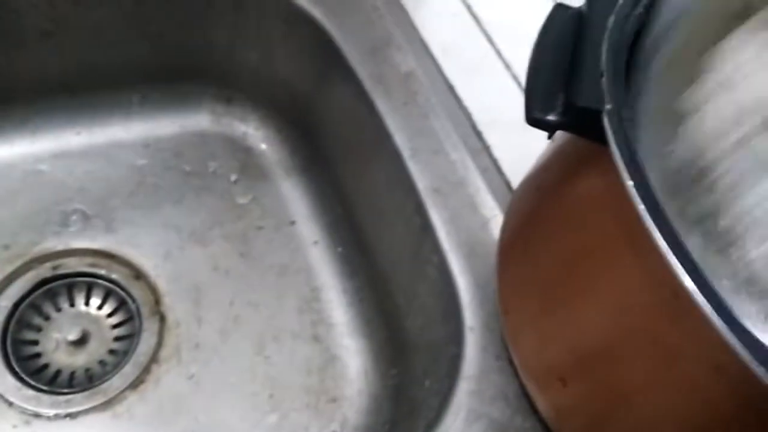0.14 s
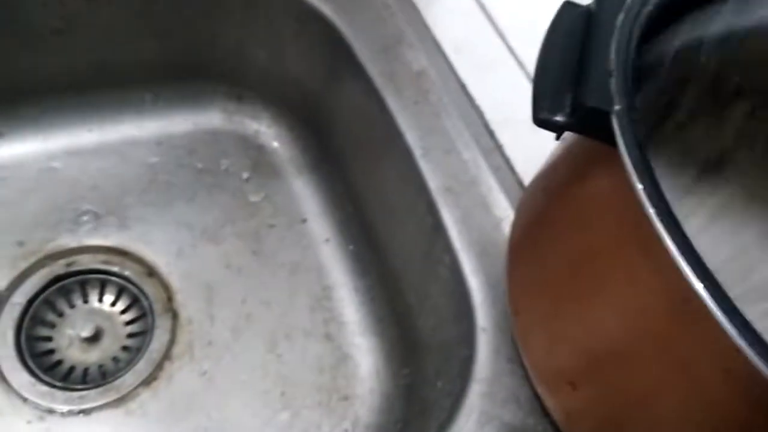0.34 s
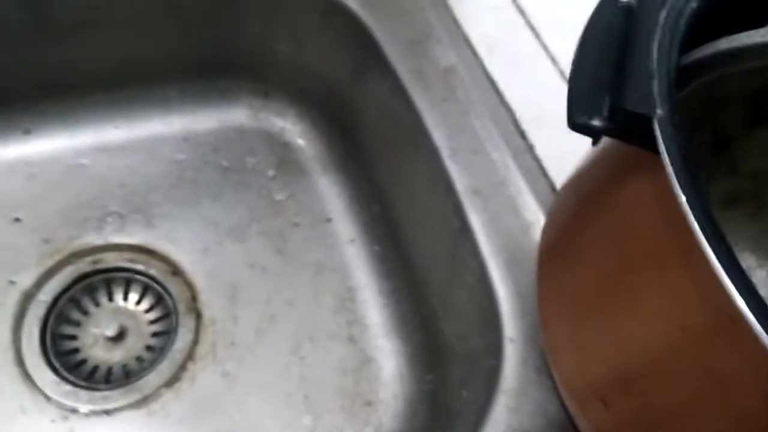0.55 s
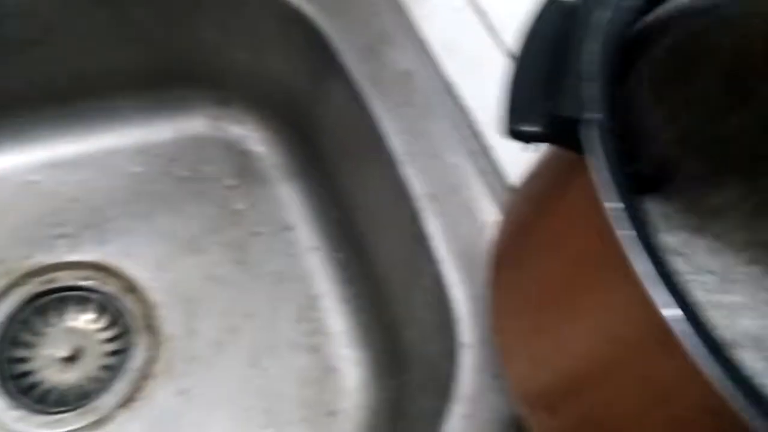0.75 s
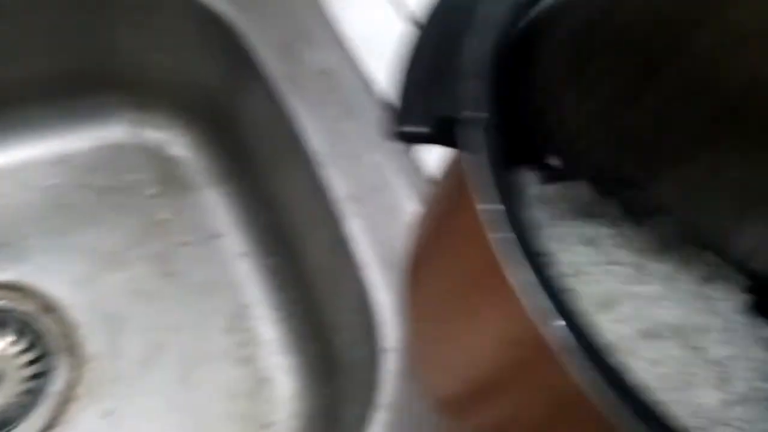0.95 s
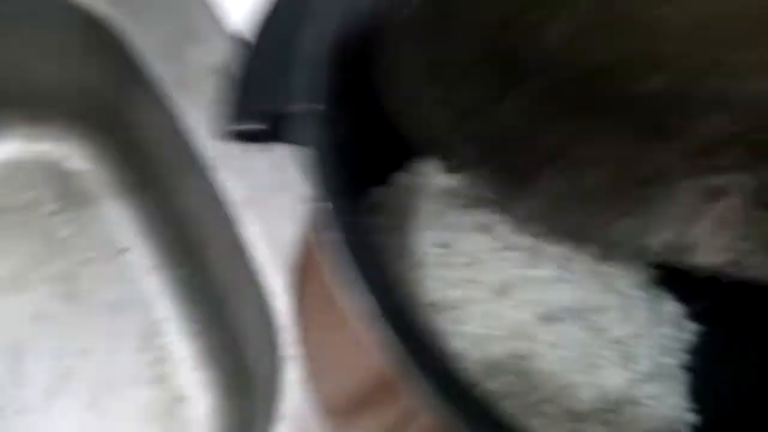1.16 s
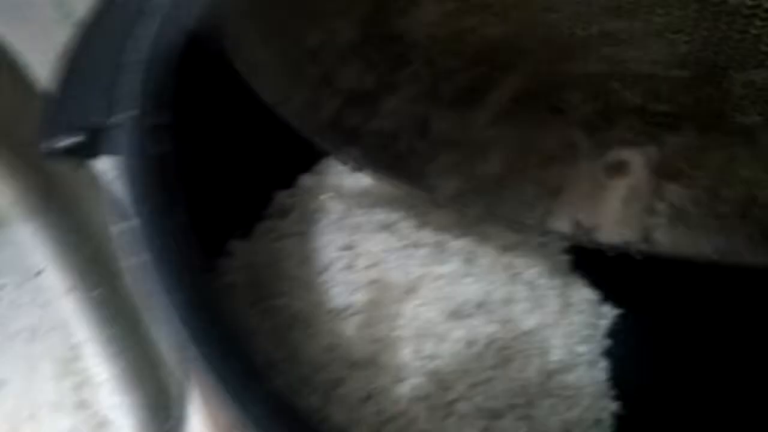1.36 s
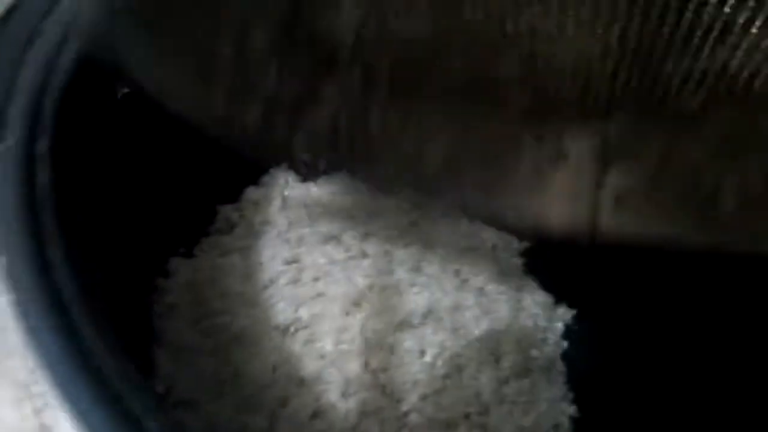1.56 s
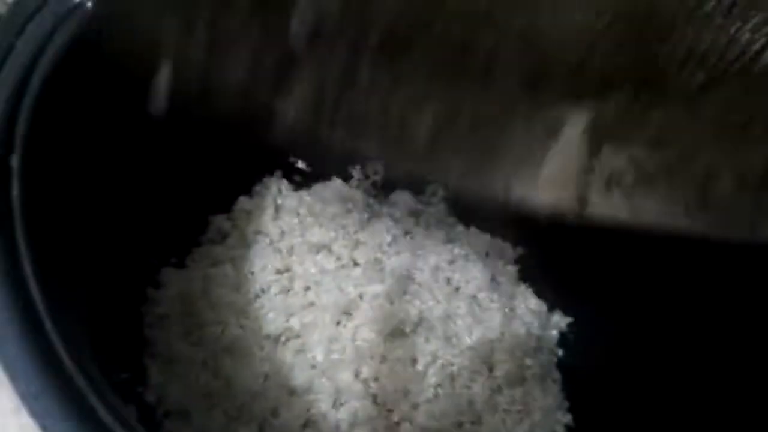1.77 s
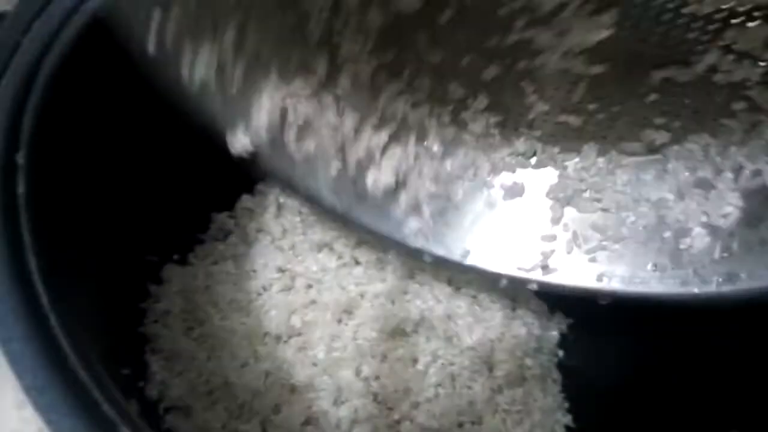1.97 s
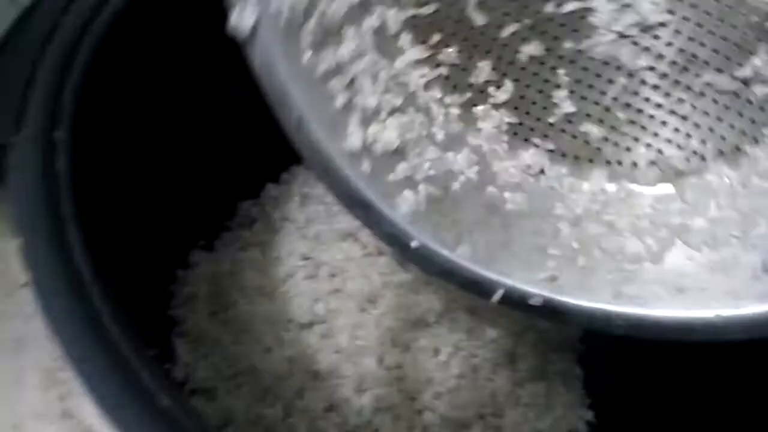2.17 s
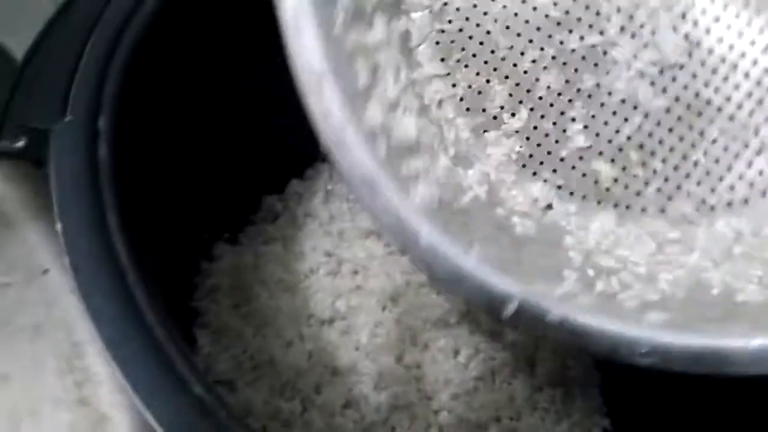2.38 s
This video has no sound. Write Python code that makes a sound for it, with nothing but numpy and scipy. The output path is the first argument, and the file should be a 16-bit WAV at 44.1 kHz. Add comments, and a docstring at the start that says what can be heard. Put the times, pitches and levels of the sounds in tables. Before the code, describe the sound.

Close up in a quiet, hard-walled kitchen, wet rice is tipped into a pot: a hollow knock, a short steel ring and a bright grainy rush, thinning to scattered crisp ticks of falling clumps and a few softer bumps.

```python
"""Wet rice poured into a pot

Wet rice slides out of a metal strainer into a cooking pot, heard close up in a hard-walled kitchen.
The strainer knocks the pot, exciting damped modes in both. The mass lands, and a thinner stream and
single clumps follow: many tiny impacts that add up to bright noise. The room reverberates over
the kitchen's hum and hiss, and a low handling rumble comes and goes."""
import sys
import numpy as np
from scipy import signal
from scipy.fft import rfft, irfft, next_fast_len
from scipy.io import wavfile
from scipy.ndimage import uniform_filter1d, map_coordinates

SR = 44100
rng = np.random.default_rng(int(sys.argv[2]) if len(sys.argv) > 2 else 0)


def persist_wave(psi):
    """Save psi, clipped to +-1, as 16-bit WAV."""
    counts = np.round(np.clip(psi, -1, 1) * 32767).astype(np.int16)
    wavfile.write(sys.argv[1], SR, np.atleast_2d(counts).T)


N = 108045


def amp(db):
    """Decibels to amplitude ratio."""
    return 10 ** (np.asarray(db) / 20)


def unit(x):
    """Normalisation to rms 1."""
    return x / np.sqrt(np.mean(x ** 2) + 1e-20)


def along(points, hz):
    """Interpolation of (frequency, value) points on a logarithmic frequency axis."""
    f, values = np.transpose(points)
    return np.interp(np.log(hz + 1), np.log(f + 1), values)


def curves(rows):
    """Linear interpolation of each column after the time, one value per sample."""
    times, *columns = np.transpose(rows)
    return [np.interp(np.arange(N) / SR, times, column) for column in columns]


def wobble(rate):
    """Smooth random modulation: a spline through `rate` knots a second."""
    return map_coordinates(rng.standard_normal(int(N * rate / SR) + 4), [np.arange(N) * rate / SR])


def filtered(x, response):
    """Linear filtering: the spectrum of x times a frequency response."""
    size = next_fast_len(x.shape[-1] + 8192)
    return irfft(rfft(x, size) * response(np.fft.rfftfreq(size, 1 / SR)), size)[..., :x.shape[-1]]


def coloured(x, spectrum):
    """Spectral shaping by (frequency, level) points, at rms 1."""
    return unit(filtered(x, lambda hz: amp(along(spectrum, hz))))


def resonance(f, hz, width_hz):
    """Band-pass response of a damped oscillator."""
    return 1j * f * width_hz / (hz * hz - f * f + 1j * f * width_hz)


def noise_band(size, hz, width_hz):
    """White noise through two equal resonators in series, at rms 1."""
    return unit(filtered(rng.standard_normal(size), lambda f: resonance(f, hz, width_hz) ** 2))


def add(track, start, x):
    """Superposition of x on the track from `start` seconds."""
    part = track[round(start * SR):][:len(x)]
    part += x[:len(part)]


def ring(modes, t, tilt_db=0, pivot_hz=1000, scatter_db=1.5):
    """Modal synthesis: damped sinusoids of alternating sign, their levels scattered at each blow."""
    out = np.zeros(len(t))
    for k, (hz, db, t60) in enumerate(modes):
        level_db = db + tilt_db * np.log2(hz / pivot_hz) + rng.normal(0, scatter_db)
        out += (-1) ** k * amp(level_db - 60 * t / t60) * np.sin(2 * np.pi * hz * t)
    return out


# Spectrum of the kitchen's hum and hiss: (frequency [Hz], relative density [dB])
AIR_SPECTRUM = [(15, -30), (40, -15), (175, -7), (290, 2), (500, -13.5), (700, -11.5), (1200, -20),
                (3000, -25), (7500, -22.5), (16000, -20)]
# Spectrum of the handling rumble: (frequency [Hz], relative density [dB])
HANDLING_SPECTRUM = [(25, -22), (45, -11.5), (68, 2), (90, -9), (115, -3), (150, -21.5), (250, -59)]
# Envelope of the handling rumble: (time [s], level [dB])
HANDLING_LEVELS = [(0.0, -67), (0.26, -70), (0.61, -61.5), (0.65, -69.5), (0.86, -59), (0.91, -71),
                   (1.1, -59), (1.25, -74.5), (1.42, -68.5), (1.52, -81.5), (1.58, -53), (1.64, -73),
                   (1.98, -63), (2.01, -69), (2.41, -62.5), (2.45, -69)]


def background():
    """Modulated noise: the kitchen's hum and hiss, and a low handling rumble that comes and goes."""
    air = coloured(rng.standard_normal(N), AIR_SPECTRUM)
    handling = coloured(rng.standard_normal(N), HANDLING_SPECTRUM)
    return amp(-70.5 + wobble(3.1)) * air + amp(curves(HANDLING_LEVELS)[0]) * handling


# Reverberation time of the kitchen: (frequency [Hz], T60 [s])
KITCHEN_DECAY = [(300, 0.31), (2000, 0.59), (7000, 0.58), (15000, 0.32)]


def reverberation(x, delay_s=0.0047):
    """Convolution of each block of x with a fresh noise tail whose decay depends on frequency."""
    out, block = np.zeros(N), SR // 8
    for start in range(0, N, block):
        hz, t, spectra = signal.stft(rng.standard_normal(SR // 2), SR, nperseg=256)
        decay = amp(-60 * t / along(KITCHEN_DECAY, hz)[:, None])
        tail = signal.istft(spectra * decay, SR, nperseg=256)[1]
        echo = signal.fftconvolve(x[start:start + block], tail / np.linalg.norm(tail))
        add(out, start / SR + delay_s, echo)
    return out


# Tones of the shifting pot: (time [s], duration [s], frequency [Hz], drift [Hz], level [dB])
POT_TONES = [(.94, 0.33, 255, 10.5, -64), (1.06, 0.12, 354, -23, -60), (1.0, 0.15, 640, 10, -67.5),
             (1.22, 0.44, 495, -10.5, -70.5), (1.31, 0.091, 498, -22, -60.5), (1.44, 0.39, 351, 0.5, -60.5),
             (1.83, 0.088, 336.4, 17.5, -56.5), (1.9, 0.26, 360.6, -4.5, -71), (1.9, 0.26, 470, -18, -68),
             (2.28, .17, 633, 75, -71), (2.35, 0.046, 292, -12.5, -63.5),
             (2.39, 0.055, 331.4, -40.5, -70.5)]


def pot_tones(waver_hz=14):
    """Amplitude and frequency modulation: faint tones swell, waver and fade as the pot shifts."""
    out = np.zeros(N)
    for start, duration, hz, drift, db in POT_TONES:
        progress = np.arange(round(duration * SR)) / (duration * SR)
        pitch = hz + drift * (progress - .5) + waver_hz * wobble(44.8)[:len(progress)]
        envelope = amp(db + 3.7 * wobble(14.6)[:len(progress)]) * np.sqrt(np.sin(np.pi * progress))
        add(out, start, envelope * np.sin(2 * np.pi * np.cumsum(pitch) / SR))
    return out


# Envelope of the rubbing: (time [s], level [dB])
RUB_LEVELS = [(.15, -78.5), (.22, -62), (.25, -38.5), (.3, -50.5), (.38, -42), (.44, -57), (.63, -67.5),
              (.8, -63.5), (.92, -68), (1.04, -63.5), (1.11, -68), (1.38, -77.5), (1.55, -64.5),
              (1.64, -50), (1.7, -61.5), (1.77, -49.5), (1.83, -64), (2.08, -76), (2.2, -81), (2.45, -72)]
# Spectrum of the rubbed pot: (frequency [Hz], relative density [dB])
RUB_SPECTRUM = [(150, -11), (260, -11), (300, -1), (350, 1), (455, 0), (520, 0.5), (650, -15), (1100, -20),
                (2000, -60)]


def pot_rubbing():
    """Friction noise: the pot rumbles faintly while it is rubbed and shifted."""
    rumble = coloured(rng.standard_normal(N), RUB_SPECTRUM)
    return amp(curves(RUB_LEVELS)[0] + 2.3 * wobble(24.77)) * rumble


# Blows of the load on the pot's wall: (time [s], level [dB], rise [s])
WALL_BLOWS = [(.258, -35, .04), (1.77, -66.5, 0.021)]


def pot_wall(hz=794, t60=0.77):
    """Free vibration: one lightly damped mode of the wall sings on after each blow."""
    out, t = np.zeros(N), np.arange(SR) / SR
    for start, db, rise in WALL_BLOWS:
        envelope = amp(db - 60 * t / t60) * (1 - np.exp(-t / rise))
        add(out, start, envelope * np.sin(2 * np.pi * hz * t))
    return out


# Taps on the strainer: (time [s], level [dB], rise [s])
STRAINER_TAPS = [(.31, -32.5, 0.0048)]
# Modes of the strainer: (frequency [Hz], relative level [dB], T60 [s])
STRAINER_MODES = [(1106.5, 4, .2), (1225, -4, 0.17), (1780, -17, 0.074), (2446, 7, 0.1), (2750, -8, 0.34),
                  (3830, -11, 0.21), (5000, -9, 0.27), (6555, -10.5, 0.51), (7060, -13.5, 0.22),
                  (7730, -5.5, .3), (8820, -13, .3), (8900, -9, .3), (11080, -13, 0.17)]


def strainer():
    """Shell vibration: the thin steel bowl rings in inharmonic modes when struck."""
    out, t = np.zeros(N), np.arange(SR) / SR
    for start, db, rise in STRAINER_TAPS:
        add(out, start, amp(db) * ring(STRAINER_MODES, t) * (1 - np.exp(-t / rise)))
    return out


# Knocks on the pot: (time [s], ring level [dB], tilt [dB/octave], contact time [s], thump level [dB],
# crunch level [dB], crunch frequency [Hz], crunch T60 [s], crunch Q [1])
POT_KNOCKS = [(.214, -20, 7, 0.0046, -41.5, -17, 2570, 0.023, 1.75),
              (.248, -31, 1.5, 0.0057, -65, -30.5, 2040, 0.2, 5.2),
              (.322, -38, 19, 0.0035, -73, -35, 1290, 0.16, 2.2),
              (0.854, -46, -4, 0.0018, -52, -44, 2250, 0.033, 1.2),
              (1.017, -59.5, 0, 0.0016, -62, -41.5, 1620, 0.043, 2.7),
              (1.047, -51.5, -16, 0.0016, -62, -41.5, 2230, 0.026, 1.6),
              (1.159, -94, 1, .002, -80.5, -37, 2310, 0.019, 4.1),
              (1.38, -74, 10, .002, -80, -55.5, 920, 0.045, 3),
              (1.456, -83, 0, 0.0023, -64, -65, 1200, 0.019, 1.4),
              (1.548, -64.5, 7, 0.0024, -76, -55.5, 3000, 0.033, 1.2),
              (1.575, -38, -2, .002, -36.5, -34.5, 1810, 0.028, 0.55),
              (1.626, -47.5, -13.5, 0.0027, -62.5, -59, 1200, 0.11, 1),
              (1.722, -39, 3, 0.0022, -46.5, -49.5, 1420, 0.14, 1.4),
              (1.733, -38, 2, 0.0084, -50, -49.5, 3010, .12, 2),
              (1.758, -48, -15, 0.001, -51, -58, 890, 0.037, 1.2),
              (1.91, -57.5, 10, 0.0015, -62, -67, 1500, 0.022, 1.8),
              (2.056, -75.5, 0, 0.0018, -80.5, -42.5, 3820, 0.074, 5),
              (2.121, -73, 0, .002, -77.5, -52, 2600, 0.022, 9.6),
              (2.233, -74, 0, .002, -77, -56, 2580, 0.037, 11)]
# Modes of the pot: (frequency [Hz], relative level [dB], T60 [s])
POT_MODES = [(293.8, -15.5, 0.27), (351.6, -13.5, .15), (394.7, -3, .1), (454.8, 8, 0.064), (505, -6, 0.11),
             (578, -16.5, 0.099), (842, -20.5, .06)]


def pot_knocks(thump_hz=152, thump_t60=0.066):
    """Impact excitation: each knock rings the pot's hollow modes, with a thump and a gritty crunch."""
    out, t = np.zeros(N), np.arange(SR // 2) / SR
    for start, ring_db, tilt_db, contact, thump_db, crunch_db, hz, t60, q in POT_KNOCKS:
        crunch = amp(crunch_db - 60 * t / t60) * (1 - np.exp(-10 * t / t60))
        crunch *= noise_band(len(t), hz, hz / q)
        modes = amp(ring_db) * ring(POT_MODES, t, tilt_db, pivot_hz=POT_MODES[3][0])
        thump = amp(thump_db - 60 * t / thump_t60) * np.sin(2 * np.pi * thump_hz * t)
        add(out, start, (modes + thump) * (1 - np.exp(-t / contact)) + crunch)
    return out


def grains(spectrum, level_db, per_second=1500, spread_db=5.5, decay_s=.0012, dense_db=-38):
    """Shot noise at rms 1: random grain impacts over a blur of many, merging to a rush above dense_db."""
    hits = rng.random(N) < per_second / SR
    impulses = hits * amp(spread_db * np.minimum(rng.exponential(size=N), 4))
    ticks = signal.lfilter([1], [1, -np.exp(-1 / (decay_s * SR))], impulses) * rng.standard_normal(N)
    blur_share = .5 + .5 / (1 + np.exp((dense_db - level_db) / 3))
    rush = np.sqrt(1 - blur_share) * unit(ticks) + np.sqrt(blur_share) * rng.standard_normal(N)
    # Random patches in time and frequency make the colour flicker.
    spectra = signal.stft(rush, nperseg=256)[2]
    patches = uniform_filter1d(rng.standard_normal(spectra.shape), size=6, axis=0)
    patch_db = 2.5 * unit(uniform_filter1d(patches, size=5, axis=1))
    return coloured(signal.istft(spectra * amp(patch_db), nperseg=256)[1][:N], spectrum)


# Spectra of the rice's bright fizz and lower patter: (frequency [Hz], relative density [dB])
FIZZ_SPECTRUM = [(1760, -12.5), (3000, -17), (3260, -11.5), (3970, -9.5), (6810, 0.5), (8340, -1.5),
                 (9200, -1), (14800, -11.5), (16000, -32)]
PATTER_SPECTRUM = [(350, 1), (600, -12.5), (804, -7), (1330, -11.5), (1510, -8), (1630, -6), (5000, 0.5),
                   (6500, 3), (11000, -120)]
# Flow of rice: (time [s], fizz level [dB], patter re fizz [dB])
STREAM_LEVELS = [(.1, -100, -16), (.14, -72.5, 7), (.19, -48.5, -18), (.215, -37, -8), (.245, -30, -6),
                 (.27, -38, -0.5), (.303, -40, 0.5), (.312, -21, -15), (.33, -22.5, -10.5),
                 (.4, -33, -11.5), (.5, -48.5, -4), (.58, -55, 0), (.64, -50.5, 2), (.68, -55.5, -3.5),
                 (.73, -46.5, -7.5), (.77, -54, -2.5), (.82, -43, -3.5), (.845, -34, -12),
                 (.88, -50.5, 0.5), (.91, -45, -14), (.955, -61, -4.5), (1.02, -47.5, -5), (1.07, -52, -9),
                 (1.13, -70.5, -7), (1.2, -64.5, -16), (1.28, -57, -3.5), (1.33, -72, -1), (1.47, -59, -25),
                 (1.54, -67, -7.5), (1.6, -56, -7), (1.7, -70.5, -3), (1.85, -70.5, -10), (1.97, -66, -17),
                 (2.03, -47.5, -17), (2.15, -68, -19), (2.3, -75, -9.5), (2.45, -82, 3)]


def rice_stream():
    """Granular flow: countless impacts sum incoherently to fizz and patter, in uneven surges."""
    level_db, patter_db = curves(STREAM_LEVELS)
    pouring = np.arange(N) >= STREAM_LEVELS[0][0] * SR
    surge = pouring * amp(level_db + 0.76 * wobble(61.04))
    return surge * (grains(FIZZ_SPECTRUM, level_db) + amp(patter_db) * grains(PATTER_SPECTRUM, level_db))


# Falling clumps: (time [s], nominal peak level [dB], centre frequency [Hz], patter re fizz [dB],
# T60 [s], snap re fizz [dB])
RICE_CLUMPS = [(0.1105, -55, 8870, -24, 0.04, 0), (0.1388, -37, 6380, -32, 0.045, -12),
               (0.1456, -28, 8300, -30, 0.02, -18), (0.1584, -29, 7100, -31, 0.027, -8),
               (0.183, -36, 6170, -13, 0.057, -4), (0.5655, -28.5, 7060, -32, 0.017, -13),
               (0.6138, -37, 5450, -30, 0.021, -1.5), (0.715, -30, 6220, -19, 0.047, -1.5),
               (0.7676, -26.5, 6500, -38, 0.017, -15), (0.843, -21, 6900, -5.5, 0.035, -7),
               (0.9004, -30.5, 6340, -21, 0.042, -14), (0.9807, -33, 6190, -9, 0.023, 6),
               (1.0035, -29, 6740, -45, 0.069, 4), (1.0322, -23, 6950, -48, 0.016, 8),
               (1.0456, -28.5, 8100, -4.5, 0.028, 6.5), (1.1815, -25.5, 7800, -33, 0.025, 1),
               (1.1957, -34, 6900, -39, 0.079, -7), (1.2204, -39, 6000, -34, 0.026, -1.5),
               (1.2439, -33, 7900, -35, 0.042, 0), (1.263, -28.5, 6700, -16, 0.072, -8),
               (1.3027, -39.5, 6950, -31, 0.029, -10), (1.359, -34, 7500, -45, 0.023, 4),
               (1.3817, -33, 8100, -54, 0.05, 12), (1.4512, -24, 6340, -15, 0.052, 2),
               (1.4656, -30.5, 5940, -14, 0.03, -1.5), (1.586, -27.5, 8200, -7, 0.028, -3),
               (1.6205, -36.5, 6060, -18, 0.062, 4), (1.6471, -40.5, 8100, -29, 0.091, -4),
               (1.782, -49.5, 5720, -35.5, 0.03, 0), (1.7999, -32, 10600, -49, 0.053, 8),
               (1.896, -32.5, 9480, -30, 0.028, -8.5), (1.9403, -29.5, 8260, -50.5, 0.046, 4.5),
               (1.9801, -21, 7400, -22, 0.061, 10.5), (1.9841, -18, 5750, -13, 0.056, -6),
               (1.9911, -23, 9640, -37, 0.025, 1.5), (2.01, -28, 6080, -15, 0.062, 3),
               (2.0164, -9.5, 11230, -16.5, 0.029, 1.5), (2.0392, -24.5, 7200, -16, 0.036, 0.5),
               (2.0797, -22, 8960, -45, 0.015, -8), (2.1205, -20.5, 7470, -47.5, 0.028, 7),
               (2.1284, -34, 9430, -54, 0.05, 2), (2.233, -27.5, 6910, -23.5, 0.014, -8),
               (2.2568, -43, 9000, -33.5, 0.049, 1), (2.2763, -44, 8100, -35, 0.036, 0),
               (2.4199, -36.5, 7210, -3, 0.02, 0.5)]


def rice_clumps(q=2.54, broadband=0.17, crest_db=8, rise_s=.00025, snap_t60=0.0028):
    """Impact transients: the first grain snaps, and the rest make a decaying burst of its own colour."""
    out, t = np.zeros(N), np.arange(SR // 8) / SR
    for start, peak_db, hz, patter_db, t60, snap_db in RICE_CLUMPS:
        tinted = filtered(rng.standard_normal(len(t)), lambda f: broadband + abs(resonance(f, hz, hz / q)))
        fizz = coloured(tinted, FIZZ_SPECTRUM)
        patter = amp(patter_db) * coloured(rng.standard_normal(len(t)), PATTER_SPECTRUM)
        snap = amp(snap_db - 60 * t / snap_t60) * noise_band(len(t), hz=10400, width_hz=9000)
        envelope = amp(-60 * t / t60) * (1 - np.exp(-t / rise_s))
        add(out, start, amp(peak_db - crest_db) * (snap + envelope * (fizz + patter)))
    return out


def scene(rice_cutoff_hz=440, room_db=-17.5):
    """Superposition of direct sound, reverberation and background."""
    # The rice's grains and clumps fall silent below the cutoff.
    rice = filtered(rice_stream() + rice_clumps(), lambda hz: 1 / (1 + (rice_cutoff_hz / (hz + 1)) ** 4))
    direct = rice + pot_knocks() + pot_rubbing() + strainer() + pot_wall()
    return (direct + amp(room_db) * reverberation(direct) + pot_tones() + background())[None]


def record(dry, ceiling=.26, knee=5):
    """Soft saturation rounds off the loudest peaks; a two-step low-pass limits the bandwidth."""
    soft = dry / (1 + np.abs(dry / ceiling) ** knee) ** (1 / knee)
    return filtered(soft, lambda hz: np.where(hz < 15900, 1, amp(-22) * (hz < 16800)))


dry = scene()
out = record(dry)
persist_wave(out)
```